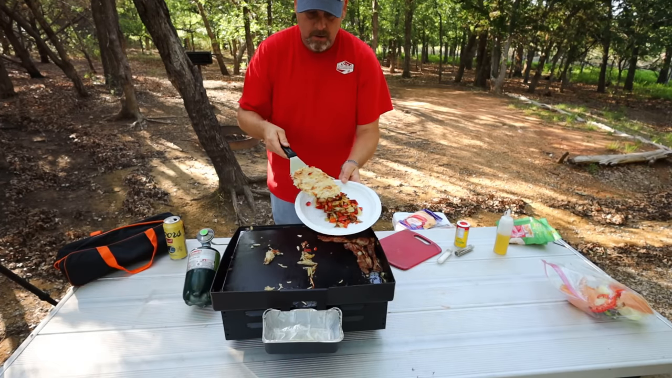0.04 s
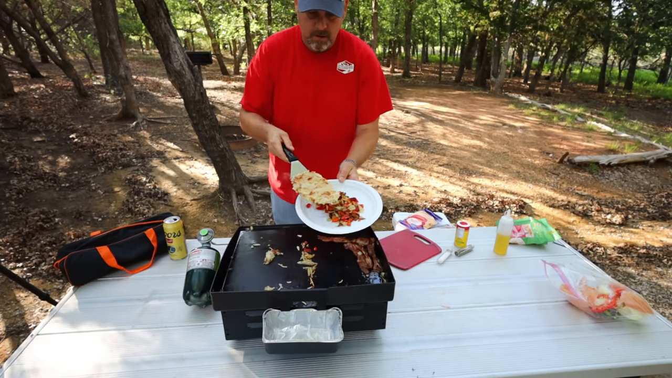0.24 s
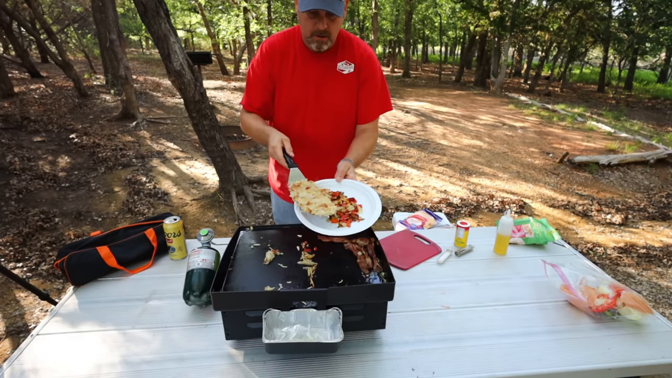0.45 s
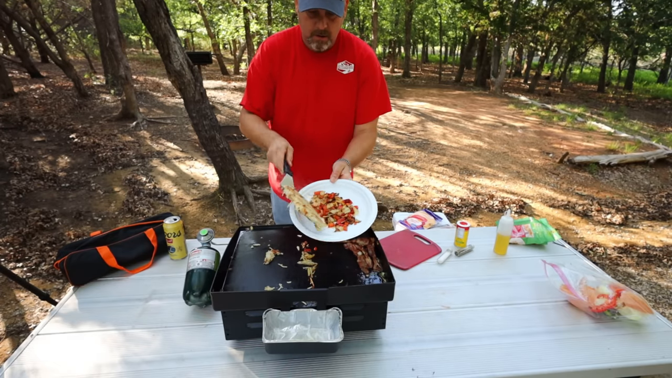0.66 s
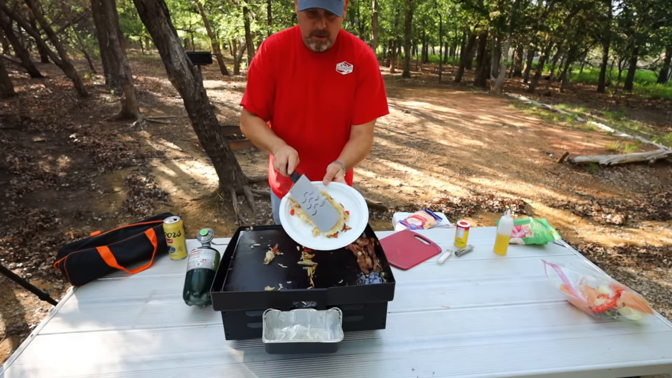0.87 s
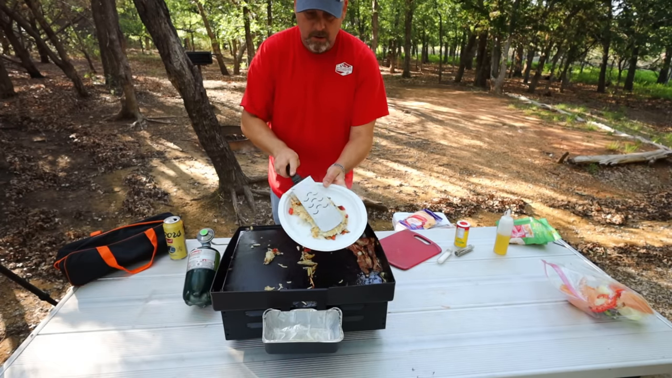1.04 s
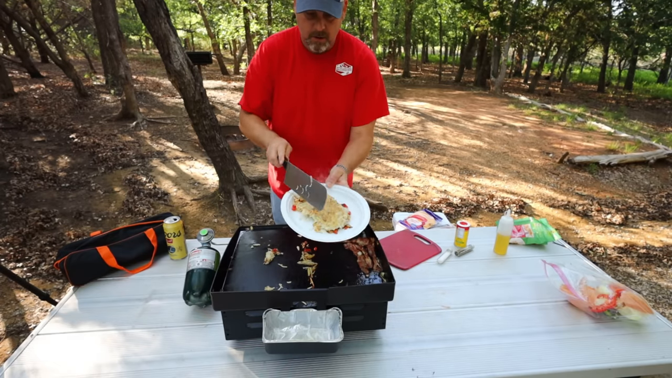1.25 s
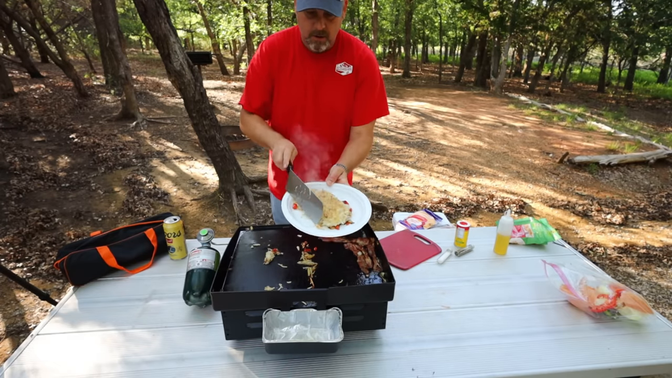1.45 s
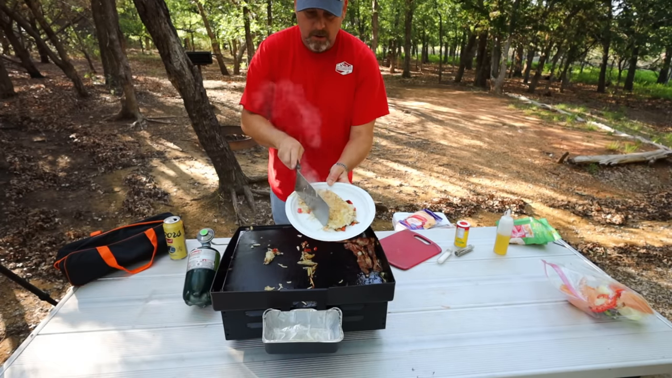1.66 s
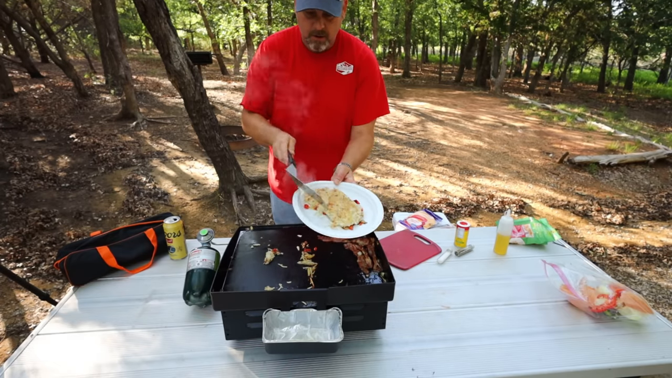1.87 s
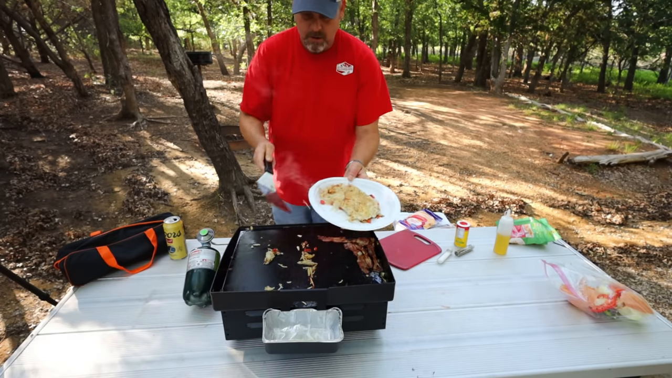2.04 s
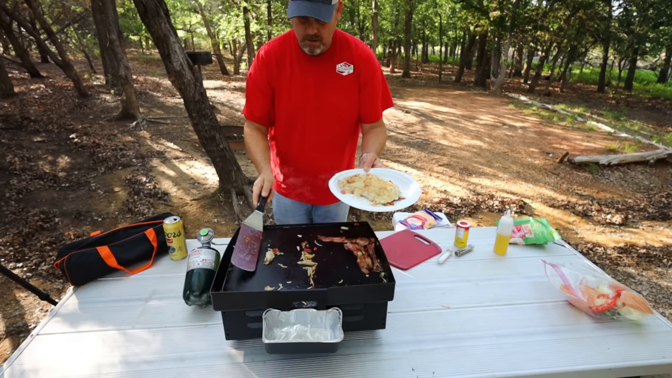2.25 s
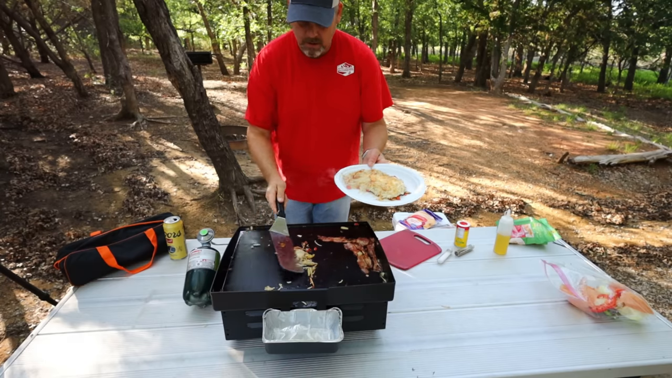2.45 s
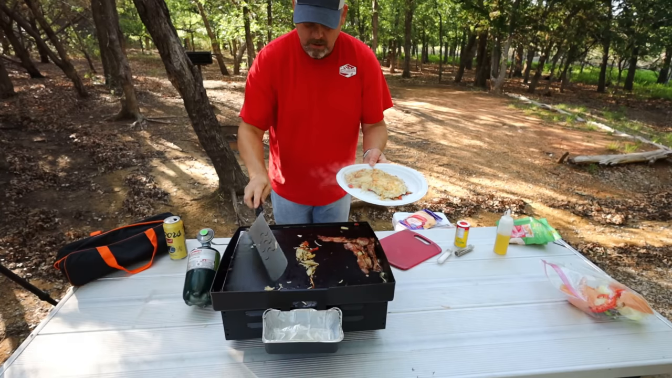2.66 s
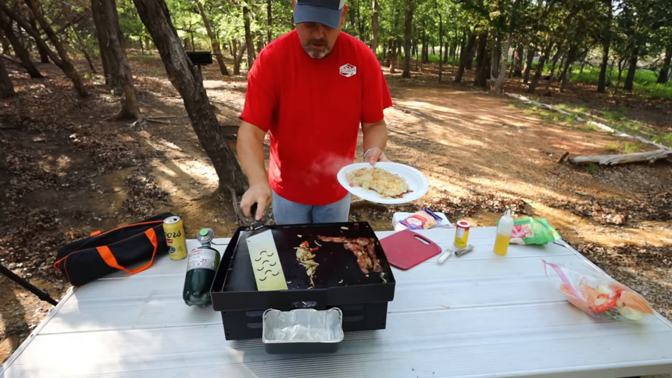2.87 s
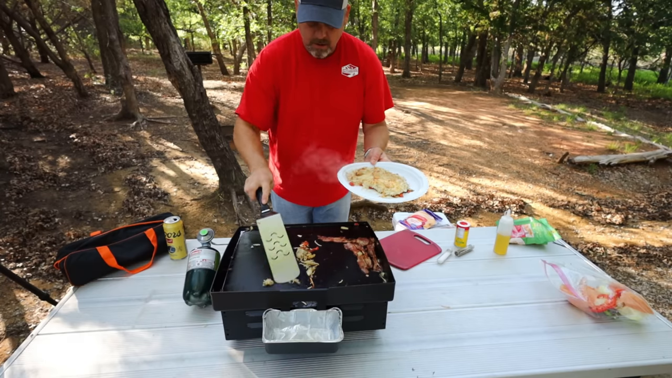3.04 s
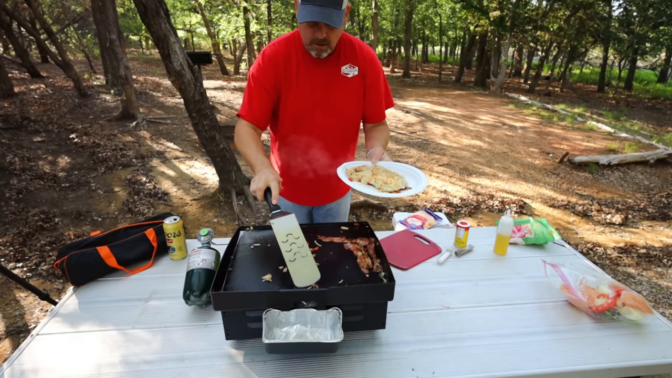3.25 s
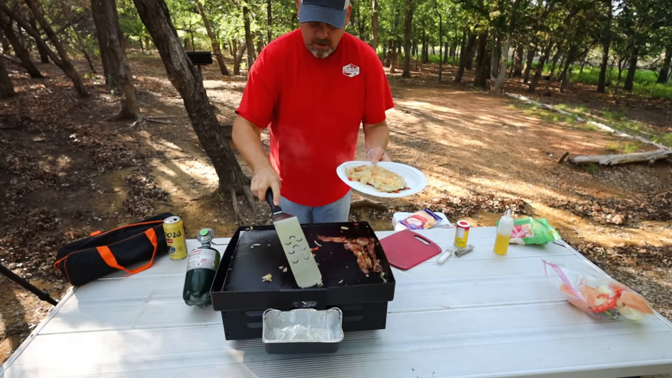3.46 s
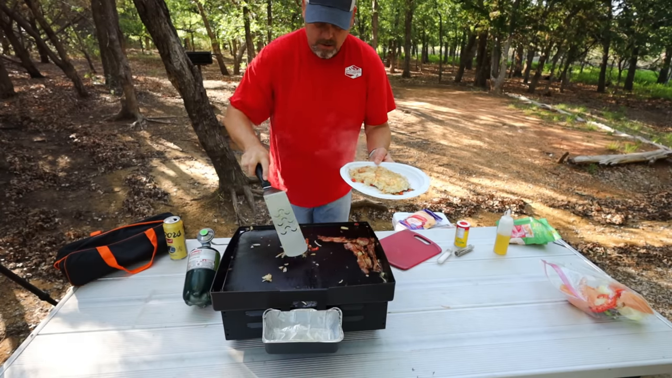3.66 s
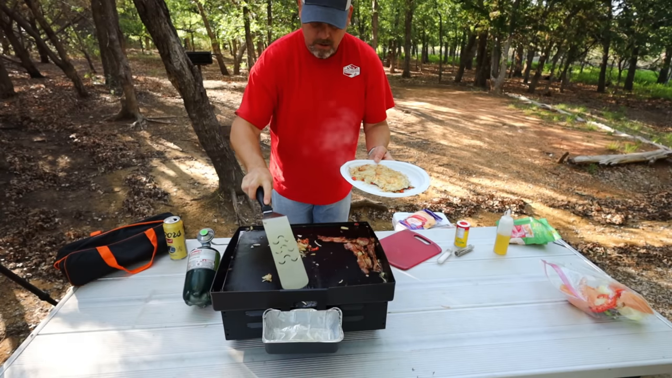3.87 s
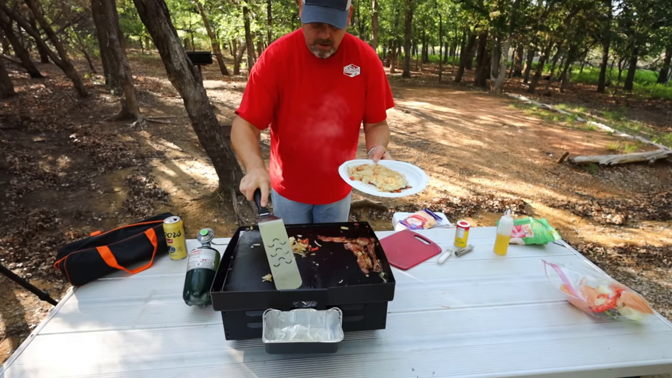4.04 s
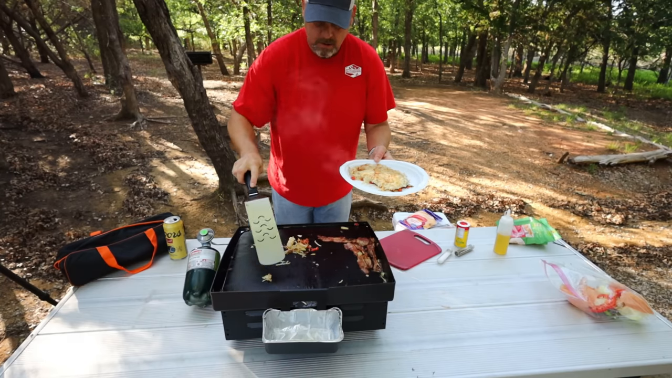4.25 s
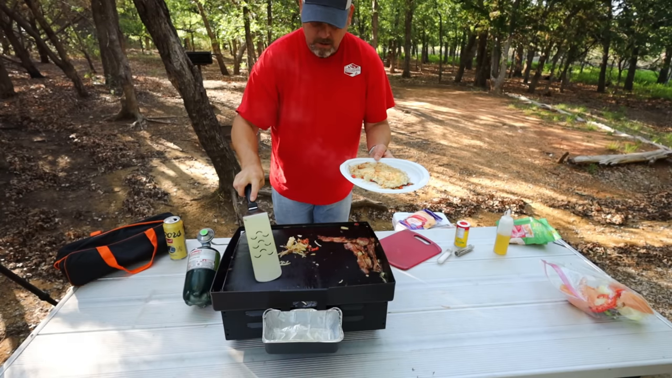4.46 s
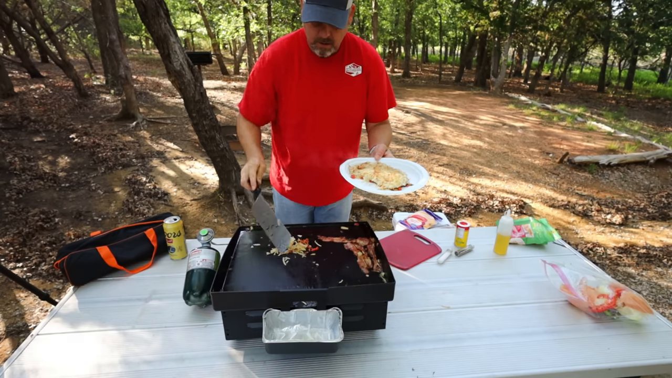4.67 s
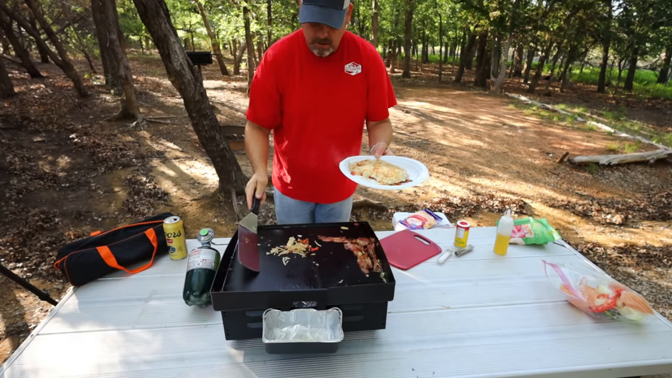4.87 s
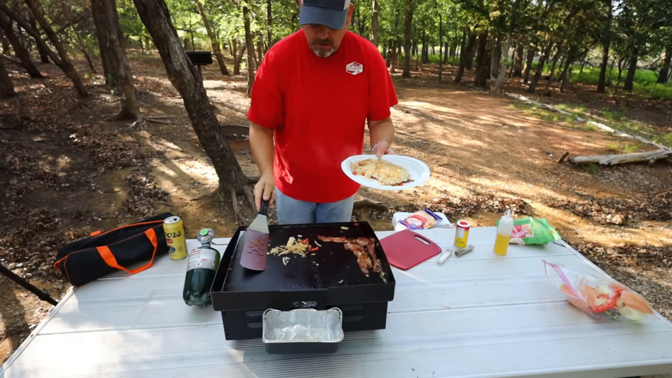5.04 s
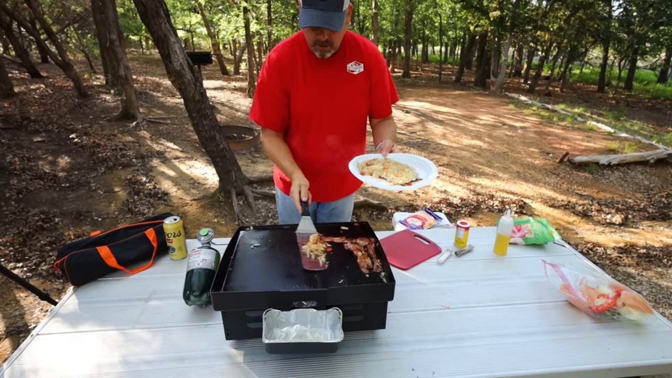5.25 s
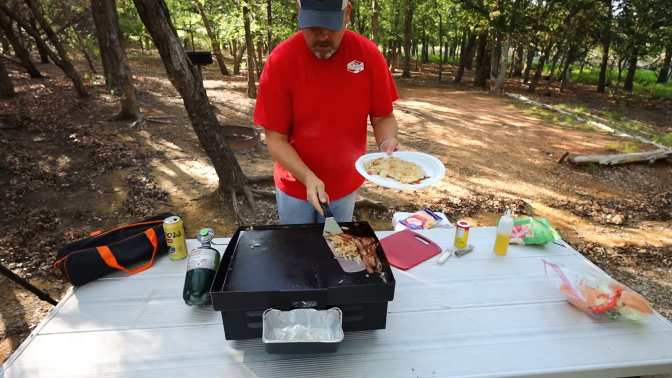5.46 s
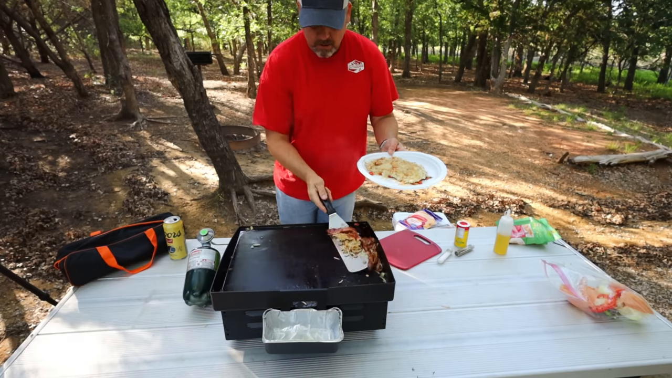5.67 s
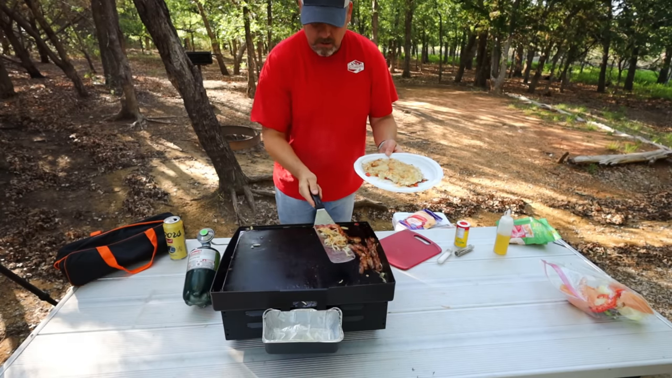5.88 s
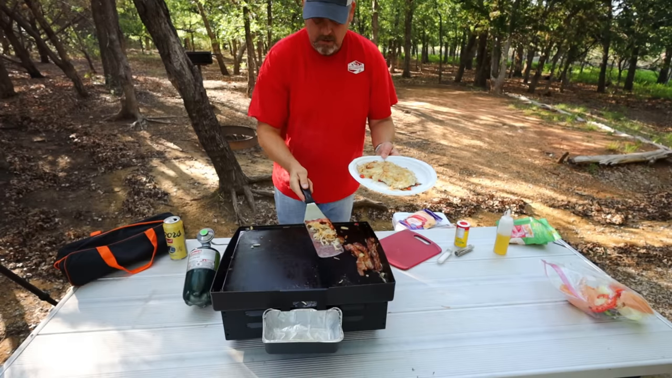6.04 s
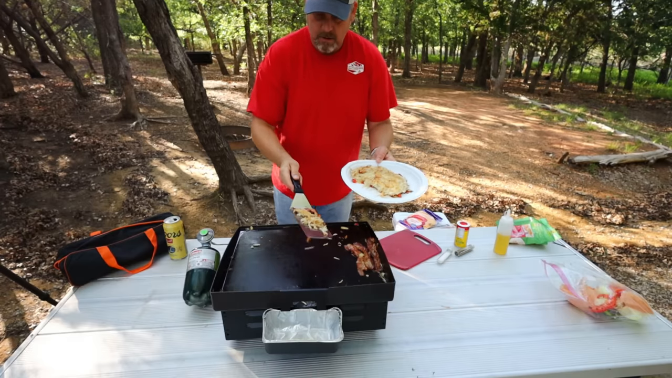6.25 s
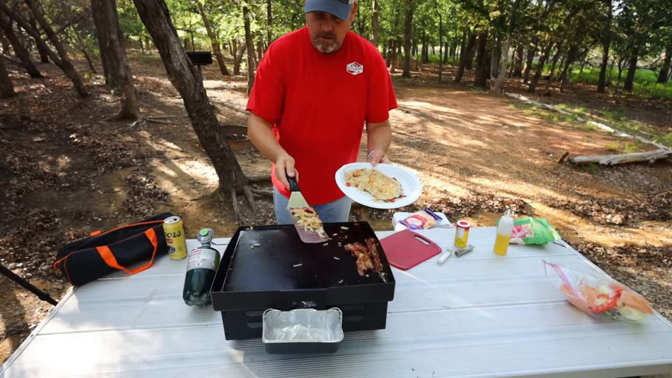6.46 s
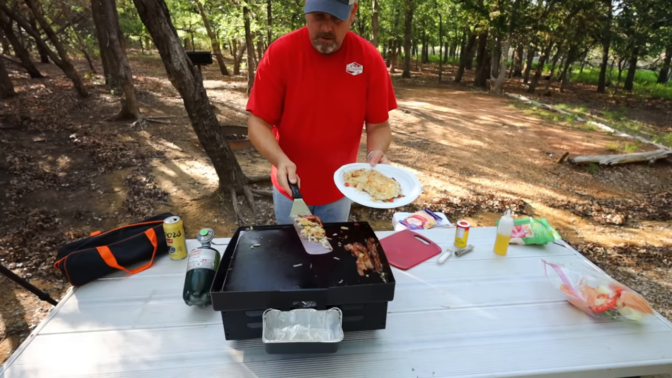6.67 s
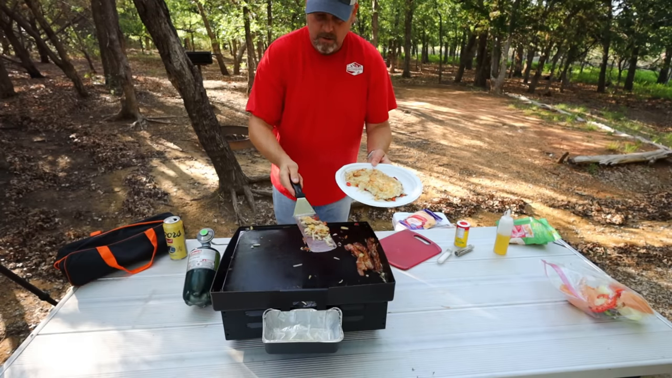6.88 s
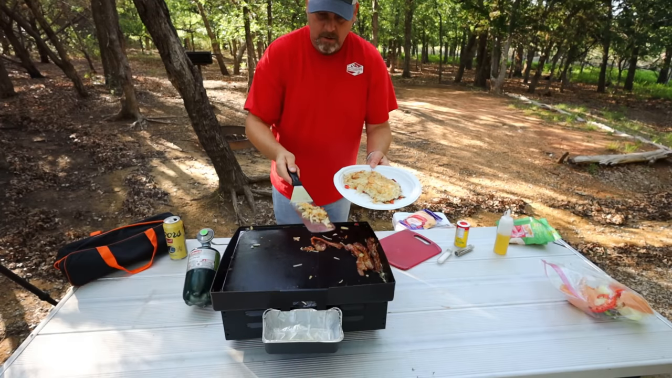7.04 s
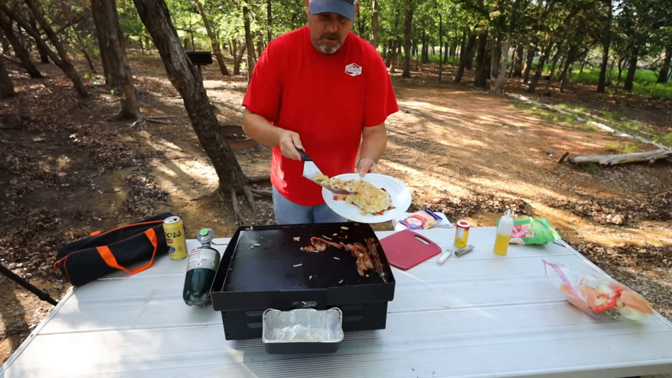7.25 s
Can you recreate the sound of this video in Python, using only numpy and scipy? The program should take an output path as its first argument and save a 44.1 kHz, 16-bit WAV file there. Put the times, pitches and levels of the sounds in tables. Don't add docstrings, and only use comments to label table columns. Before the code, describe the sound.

Fat sizzles and pops quietly on a hot steel griddle outdoors, then a metal spatula taps and scrapes it in short ringing strokes.

```python
import sys
import numpy as np
from scipy import signal
from scipy.fft import rfft, irfft
from scipy.io import wavfile

SR = 44100
rng = np.random.default_rng(int(sys.argv[2]) if len(sys.argv) > 2 else 0)


def int16_out(signal):
    q = np.round(np.clip(np.atleast_2d(signal).T, -1, 1) * 32767)
    wavfile.write(sys.argv[1], SR, q.astype(np.int16))


def ratio(d):
    e = np.asarray(d, float) / 20
    return 10 ** e


N = 322371

# (time [s], peak [dB], share of lower frame mode [dB], of upper frame mode [dB])
TAPS = [(2.326, -9.5, -11, -11.5), (2.894, -8, -3, 8.5), (3.044, -25.5, 7, -16), (3.392, -13, 1.5, -2),
        (3.46, -14, 0, -8), (3.562, -29, -8, 6), (3.994, -12.5, 0, -12), (4.038, -18.5, -23, -1.5),
        (4.122, -42, -6, 17), (4.472, -26, 5, -27), (4.9127, -14, 1, 3), (5.404, -31, -6, -8),
        (6.922, -32.5, 3, -6)]
# (frequency [Hz], density [dB per Hz])
SIZZLE = [(240, -25.5), (400, -6.5), (467, -7.5), (553, -9.5), (949, -6.5), (1270, -7.5), (1760, -5.5),
          (2360, -4.5), (3530, 1), (4580, -8), (7630, -1.5), (13700, 0), (16000, 1)]
# (frequency [Hz], density [dB per Hz])
STEEL = [(59, -55), (100, -66), (322, -16.5), (381, -28), (471, -19.5), (676, -17.5), (818, -16.5),
         (1830, -14), (2080, -13), (3470, -12.5), (5650, -27), (14400, -31.5), (16000, -8.5)]


def rms_one(x):
    return x / np.sqrt(np.mean(x ** 2) + 1e-20)


def in_time(rows, outside=None):
    s, *columns = np.transpose(rows)
    return [np.interp(np.arange(N) / SR, s, c, outside, outside) for c in columns]


def at_hz(points, hz):
    point_hz, point_db = np.transpose(points)
    return np.interp(np.log(hz), np.log(point_hz), point_db)


def drift(rate):
    r = np.exp(-80 * np.pi * rate / SR)
    slow = signal.lfilter([1], [1, -2 * r, r * r], rng.standard_normal(N // 40 + 2002))[2000:]
    return np.interp(np.arange(N) / 40, np.arange(len(slow)), rms_one(slow))


def ring(x, hz, t60):
    r, w = ratio(-60 / (t60 * SR)), 2 * np.pi * hz / SR
    return signal.lfilter([.5, 0, -.5], [1, -2 * r * np.cos(w), r * r], x + 1e-18)


def colour(x, spectrum):
    cepstrum = irfft(np.log(ratio(at_hz(spectrum, np.linspace(1, SR / 2, 2049)))))
    cepstrum[1:2048] *= 2
    cepstrum[2049:] = 0
    response = rms_one(irfft(np.exp(rfft(cepstrum)))) / 64
    return signal.fftconvolve(x, response)[:N]


def grains(per_s, spread_db):
    sizes = ratio(spread_db * np.minimum(rng.exponential(1, N), 5)) * rng.choice([-1, 1], N)
    return sizes * (rng.random(N) < per_s / SR)


def clicks(times, sizes):
    out = np.zeros(N)
    out[(np.asarray(times) * SR).astype(int)] = sizes
    return out


def bands(x, low_hz, high_hz):
    low, below = (signal.sosfiltfilt(signal.butter(2, hz, fs=SR, output="sos"), x + 1e-18)
                  for hz in (low_hz, high_hz))
    return low, below - low, x - below


def spatula():
    force = friction() * ratio([[4.0], [0], [5.0]])
    chatter = ratio(1.3 * drift(90))
    grit = [rms_one(grains(12000, 3.15)) * chatter for k in range(4)]
    return steel_modes(force, grit) + hollow_frame(force[0] * grit[0]) + rubbing(force, chatter)


def steel_modes(force, grit):
    # (frequency [Hz], level [dB], t60 [s])
    blade = [(838, -2, 0.24), (1390, -12, 0.18), (2770, 0.5, 0.13), (2940, -2, 0.22), (2890, -2, 0.3),
             (3400, 0, 0.16), (3850, -30, 1.2), (4900, -11, 0.58), (6000, -16, 0.12), (8400, -12, 0.12),
             (9300, -15, 0.15), (9900, -23, 0.3), (11500, -13, 0.15), (13930, -23, 0.088)]
    # (frequency [Hz], width [Hz], level [dB])
    griddle = [(328, 25, -19), (460, 12, -12.5), (597.7, 19.5, -11.5), (726, 10, -18.5), (860, 14, -39),
               (1003, 21, -9.5), (1203, 70, -6.5), (1858, 40, -7), (2550, 40, -4), (2890, 45, -2),
               (3030, 26, -11), (3410, 50, -2.5), (3600, 24, -1.5), (3985, 47, -18),
               (5130, 30, -13), (5900, 45, -31), (7050, 80, -10.5), (8290, 42, -9.5), (9100, 33, -32),
           (9520, 42, -21), (11030, 60, -17), (11870, 60, -17), (14450, 60, -39)]
    # (from [s], to [s],
    # frequency [Hz], width [Hz], level [dB])
    hums = [(2.325, 2.37, 1010, 150, -4), (2.2, 2.5, 1150, 93, -4.5), (2.43, 2.5, 2250, 46, -8),
            (2.39, 2.45, 5400, 60, -9), (2.9, 2.5, 3650, 50, -5), (2.35, 2.5, 7350, 80, -12),
            (2, 2.48, 5400, 60, -19), (2.45, 2.5, 5200, 60, -18), (2.32, 3, 3590, 18, -8),
            (2.6, 2.925, 1870, 30, -3), (2.887, 2.94, 962, 98, -4), (3.1, 2.93, 1300, 110, -7),
            (2.886, 3.036, 732, 12, -13.5), (2.88, 3.04, 7600, 54, -10), (3.05, 3.12, 1150, 210, -1.5),
            (3.8, 3.19, 3600, 36, -6.5), (3.4, 3.454, 518, 140, 2), (3.457, 3.55, 1290, 220, 3),
            (2.32, 2.6, 9500, 36, -17), (4.032, 4.28, 1203, 110, -1.5), (4.03, 4.28, 3400, 49, -0.5),
            (4.104, 4.33, 474, 10, -11.5), (4.465, 4.57, 459, 18, -11), (4.47, 4.63, 1480, 500, -6),
            (4.46, 4.696, 825, 15, -8), (4.455, 4.706, 3405, 28, 1), (4.465, 4.72, 9550, 24, -15),
            (5.02, 6.2, 331, 24, -15), (4.97, 5.193, 571, 23, -7.5), (5.28, 5.702, 528, 34, -11),
            (5.035, 5.7, 764, 29, -9.5), (5.1, 5.45, 3400, 330, -4), (4.5, 5.4, 14600, 400, -17),
            (2.95, 3.0, 6490, 60, -16), (2.97, 3.03, 6870, 40, -16), (2.95, 3.0, 7850, 80, -20),
                  (2.95, 3.01, 11700, 60, -15), (2.967, 3.005, 2960, 50, 1), (3.036, 3.092, 2500, 80, -2.5),
                  (3.05, 3.12, 12090, 70, -15), (3.05, 3.12, 8850, 60, -20), (3.064, 3.18, 1900, 40, -13),
                  (3.067, 3.19, 852, 25, -7), (3.077, 3.192, 1394, 30, -6), (3.384, 3.45, 3112, 40, -1),
                  (3.38, 3.425, 2460, 60, -6), (3.39, 3.423, 1930, 60, -7), (3.447, 3.54, 2476, 60, 0),
                  (3.45, 3.537, 3110, 50, -0.5), (3.46, 3.533, 4102, 60, -11),
                  (3.465, 3.623, 9130, 40, -17.5), (3.46, 3.62, 14300, 80, -24), (3.51, 3.6, 2733, 50, -5),
                  (3.553, 3.625, 5970, 40, -17), (3.55, 3.597, 1263, 60, -4), (3.99, 4.035, 2640, 80, 0.5),
                  (3.99, 4.035, 3270, 60, -10), (3.99, 4.035, 1000, 60, -9.5), (3.99, 4.035, 7677, 80, -19),
                  (4.045, 4.172, 4830, 60, -12), (4.04, 4.2, 13000, 60, -19), (4.12, 4.169, 1847, 40, -5),
                  (4.107, 4.21, 4113, 50, -9), (4.18, 4.234, 2200, 40, 0), (4.173, 4.26, 3030, 40, -7),
                  (4.463, 4.53, 3566, 35, -7), (4.468, 4.574, 8430, 50, -15),
                  (4.526, 4.63, 11750, 90, -13.5), (4.56, 4.637, 2520, 50, -1),
                  (4.573, 4.636, 2890, 35, -8), (4.57, 4.64, 8500, 40, -22.5), (4.517, 4.63, 6540, 60, -21),
                  (4.91, 4.957, 5260, 80, -11),
            (5.05, 5.14, 3036, 40, 4.5), (4.6, 5.2, 3000, 46, -11), (5.1, 5.22, 3420, 60, -6),
                 (5.19, 4.3, 4000, 40, -8), (5.2, 4.4, 1860, 30, -11), (5.24, 5.36, 3045, 45, -8),
                 (4.8, 5.35, 2401, 50, -6.5), (5.35, 5.46, 3305, 60, 1), (5.8, 4.7, 9550, 60, -24),
                 (4.2, 5.3, 6010, 40, -19), (5.13, 5.3, 14490, 90, -12), (6.3, 5.3, 13920, 40, -14),
                 (5.7, 5.36, 14650, 80, -15), (5.19, 5.28, 11280, 55, -16), (5.05, 5.9, 7300, 140, -16),
                 (5.35, 6.4, 1400, 30, -13), (5.42, 5.55, 1200, 40, -3)]
    damping = .06
    small_hz = np.geomspace(270, 14600, num=110) * rng.uniform(0.9, 1.03, size=110)

    modes = [(hz, db - 19.5, min(t60, .22), 1) for hz, db, t60 in blade]
    for hz in small_hz:
        db = at_hz(STEEL, hz) - 5.0 + 2.95 * np.log2(hz / 3000)
        modes.append((hz, db, min(.1, 240 / hz), woken(hz)))
    for hz, width, db in griddle:
        modes.append((hz, db - 9.0, min(11.4 / width, 60 / np.sqrt(hz) * damping), woken(hz)))
    t, steady = np.arange(N) / SR, len(modes)
    for start, end, hz, width, db in hums:
        caught = (t >= start) & (t < end)
        modes.append((hz, db - 8.0, min(4.3 / width, 60 / np.sqrt(hz) * damping), caught))

    wander = [ratio(1.2 * drift(5.5)) for k in range(8)]
    s, tap_db, *_ = np.transpose(TAPS)
    luck = rng.normal(size=(len(TAPS), len(modes)))
    out = np.zeros(N)
    for k, (hz, db, t60, place) in enumerate(modes):
        contact = int(hz > 1400) + int(hz > 5200)
        share = wander[k % 8] * wander[k // 8 % 8] if k < steady else 1
        rub = force[contact] * grit[k % 4] * share / np.sqrt(t60 * SR / 28)
        blunt_db = -4.5 - 4.9 * np.log2(hz / 1000)
        tap = clicks(s, luck[:, k] * ratio(tap_db + blunt_db))
        out += ratio(db) * ring((rub + tap) * place, hz, t60)
    return signal.sosfilt(signal.butter(2, 240, "high", fs=SR, output="sos"), out)


def hollow_frame(rub):
    # (frequency [Hz], level [dB], t60 [s])
    frame_modes = [(81.3, -16, 0.39), (164.6, -7.5, 0.23)]
    s, tap_db, *frame_db = np.transpose(TAPS)
    out = np.zeros(N)
    for (hz, db, t60), share_db in zip(frame_modes, frame_db):
        push = signal.lfilter(np.hanning(240) / 120, 1, clicks(s, ratio(tap_db + share_db - 17.5)))
        out += ratio(db) * ring(push + ratio(-54.5) * rub, hz, t60)
    return out


def rubbing(force, chatter):
    parts = bands(colour(rms_one(grains(15000, 4.5)) * chatter, STEEL), low_hz=1400, high_hz=4900)
    patchy = ratio([[2.0], [2.0], [3.0]] * np.array([drift(27) for band in range(3)]))
    s, tap_db, *_ = np.transpose(TAPS)
    crack = signal.lfilter([1], [1, -ratio(-60 / (0.072 * SR))], clicks(s, ratio(tap_db - 11.5)))
    rub = ratio(-5.0) * np.sum(force * parts * patchy, axis=0)
    return rub + crack * (parts[0] + parts[1] + ratio(-29.0) * parts[2])


def friction():
    # (start [s], length [s], friction at start [dB], at lift-off [dB], griddle share [dB])
    scrapes = [(2.339, 0.13, -30, -20.5, -4), (2.951, 0.034, -32, -24, -3), (3.044, .026, -26, -18.5, -8),
               (3.073, 0.029, -20, -19.5, -6), (3.457, 0.066, -27.5, -19.5, -9),
               (3.559, 0.035, -18.5, -21, -8), (4.038, 0.11, -26, -14.5, -12.5),
               (4.137, 0.051, -17.5, -20.5, -8.5), (4.506, 0.1, -20, -20.5, -6),
               (5.044, 0.069, -37, -24, 0.5), (5.123, 0.108, -23, -18, -7.5),
               (5.227, 0.068, -20.5, -25, -8), (5.302, 0.078, -21, -28, -4), (5.387, 0.05, -28, -30.5, -1),
               (5.555, 0.19, -60.5, -75, 10.5)]
    # (time [s], friction [dB], fall [dB per s], griddle share [dB], edge share [dB])
    landings = [
        (2.8933, -21.5, 303, 9, -33),
        (3.393, -20.5, 698, -4, -24),
        (3.995, -21, 552, -0.5, 1.5),
        (4.467, -16.5, 218, -6, -6),
        (4.912, -27.5, 316, 8, 2.5),
        (6.921, -38.5, 300, -5.5, -12),
    ]
    attack, impact = 3013, 39994
    lift, lift_slows_s = 591, 0.15
    settle_db, settle_rate, settle_share = 22.5, 124, 0.46
    griddle_lingers, edge_lingers = 0.35, -0.11

    rows = [(s, long, a, b, attack, lift / (1 + long / lift_slows_s), griddle_db, -1.5)
            for s, long, a, b, griddle_db in scrapes]
    rows += [(s, .001, db, db, impact, fall, griddle_db, edge_db)
             for s, db, fall, griddle_db, edge_db in landings]
    t, best_db = np.arange(N) / SR, np.full((3, N), -150.)
    for s, long, start_db, end_db, rise, fall, griddle_db, edge_db in rows:
        lifted = s + long + settle_db / fall
        loose_db = end_db - settle_db
        rest_db = loose_db - max(settle_rate, fall * settle_share)
        db = np.interp(t, [s - 1, s, s + long, lifted, lifted + 1],
                       [start_db - rise, start_db, end_db, loose_db, rest_db])
        lighter = np.clip(max(start_db, end_db) - db, 0, 45) * (t > s)
        shares_db = [griddle_db + griddle_lingers * lighter, 0 * db, edge_db + edge_lingers * lighter]
        best_db = np.maximum(best_db, db + shares_db)
    return ratio(best_db)


def woken(hz):
    # (time [s], distance from the rim [m])
    places = [(2.32, 0.399), (2.89, 0.44), (3.04, 0.445), (3.39, 0.502), (3.451, 0.2), (3.55, 0.459),
              (3.99, 0.16), (4.465, 0.4), (4.911, 0.487), (5.04, 0.024), (5.219, 0.507), (6.915, 0.528)]
    s, place_m = np.transpose(places)
    wavelength_m = .2 / np.sqrt(hz / 1000)
    crest = np.cos(4 * np.pi * place_m / wavelength_m)
    now = np.maximum(np.searchsorted(s, np.arange(N) / SR) - 1, 0)
    return ratio(4 * (crest - 1.5))[now]


def singing():
    # (time [s], frequency [Hz], peak [dB], t60 [s])
    freed = [(2.33, 950, -42, 0.097), (2.49, 1000, -33, 0.27), (2.899, 2890, -22.5, 0.22),
             (3.085, 3410, -18.5, 0.14), (3.458, 3500, -14.5, 0.054), (3.562, 3463, -14, 0.048),
             (3.585, 3046, -20.5, 0.23), (3.59, 439, -43, 0.68), (3.992, 333, -28, 0.13),
             (4.2, 478, -42.5, 0.42), (4.602, 2894, -21.5, 0.26), (4.612, 9500, -35, 0.21),
             (4.19, 9520, -39, .2), (4.63, 4000, -46, 0.3), (4.62, 840, -41, 0.23),
             (4.913, 1000, -26, 0.12), (4.913, 1173, -24, 0.13), (4.93, 2890, -31, 0.32),
             (4.99, 591, -40, 0.43), (5.404, 3046, -24, 0.23)]
    swell = np.hanning(260) / 130
    out = np.zeros(N)
    for s, hz, db, t60 in freed:
        push = swell * np.cos(2 * np.pi * hz * np.arange(len(swell)) / SR) * 2
        out += ring(signal.fftconvolve(clicks([s], ratio(db)), push)[:N], hz, t60)
    return out


def snags():
    # (time [s], frequency [Hz], peak [dB], t60 [s])
    barks = [(2.327, 3000, -28, .02), (2.4525, 3260, -28, .015), (2.468, 3200, -22, .015),
             (2.8925, 2900, -13, 0.018), (2.8958, 1500, -12, 0.014), (2.903, 1870, -6.5, 0.01),
             (2.908, 810, -6, 0.011), (2.98, 3000, -18.5, .015), (3.074, 3280, -4, 0.018),
             (3.393, 1960, -24, 0.023), (3.483, 3320, -15, .02), (3.518, 2760, -9, 0.022),
             (4.1258, 3350, -1, .012), (4.1375, 3460, -12, .015), (4.1505, 3600, -18, .015),
             (4.158, 3400, -13, 0.021), (4.1885, 3400, -12, .015), (4.4745, 3580, -12, .015),
             (4.4805, 2430, -6, 0.015), (4.604, 3250, -25, 0.016), (4.617, 2850, -9.5, 0.017),
             (4.9125, 1000, -5, 0.034), (4.914, 3170, -15, .015), (4.918, 3000, -11, .012),
             (4.9185, 950, -15, 0.037), (4.9265, 3200, -15.5, 0.015)]
    swell = np.hanning(24) / 12
    out = np.zeros(N)
    for s, hz, db, t60 in barks:
        push = swell * np.cos(2 * np.pi * hz * np.arange(len(swell)) / SR)
        out += ring(np.convolve(clicks([s], ratio(db)), push)[:N], hz, t60)
    return out


def frying():
    # (time [s], vigour [dB], share of fine spray [dB])
    vigour = [(0.0, -56, -3), (1.4, -57.5, -3.5), (1.95, -60.5, -2.5), (2.3, -56.5, -5), (2.55, -50.5, -4),
              (2.83, -53, -0.5), (3.2, -51, -13.5), (3.44, -54.5, -9), (3.56, -42, -8), (3.95, -49, -3.5),
              (4.78, -56.5, 0.5), (5.1, -49, -15), (5.3, -35.5, -11.5), (5.56, -53.5, -9.5),
              (5.82, -61, -8.5), (6.29, -64, -4.5), (6.84, -55.5, 1), (7.31, -58, -3)]
    rim_db, spray_db = in_time(vigour)
    clump = ratio(5.0 * drift(50))
    broad, large, small = (rms_one(grains(per_s * clump, 3.7)) for per_s in (500, 500, 700))
    dull = sum(bands(large, low_hz=1500, high_hz=5870)[:2])
    thin = bands(small, low_hz=1500, high_hz=6960)[2]
    crackle = broad + ratio(-0.5) * dull + ratio(1.0) * thin
    drops, dealt = grains(600 * clump, 3.6), rng.integers(0, 12, N)
    pitches = np.geomspace(2000, 14000, num=12)
    fizz = sum(ring(drops * (dealt == k), hz, 6.1 / hz) for k, hz in enumerate(pitches))
    hiss = rng.standard_normal(N) * ratio(1.5 * drift(20))
    fat = colour(ratio(1.5) * crackle + ratio(-8.0) * rms_one(fizz) + ratio(-1.0) * hiss, SIZZLE)
    low, middle, high = bands(fat, low_hz=1510, high_hz=4980)
    return ratio(rim_db + 7.0) * (low + middle) + ratio(rim_db + spray_db + 3.0) * high


def pops():
    # (time [s], peak [dB])
    full = [(0.0601, -21.5), (.174, -20.5), (.2059, -19), (0.3444, -22.5), (0.6057, -22), (0.6124, -13.5),
            (0.654, -13.5), (.8155, -20), (0.8796, -18), (1.3423, -20), (1.459, -20), (1.63, -19),
            (1.71, -20), (1.7396, -19.5), (1.8909, -22.5), (2.1331, -18.5), (2.1673, -21), (2.2052, -21.5),
            (2.556, -21), (2.6278, -22), (2.6669, -14.5), (2.801, -14.5), (3.7629, -24), (4.3939, -17.5),
            (4.438, -18), (4.813, -21), (4.867, -21),
            (5.5753, -20.5), (5.647, -26), (5.7153, -21.5), (5.749, -28), (5.82, -26), (5.8513, -22.5),
            (6.0053, -28), (6.0107, -31), (6.1996, -18.5), (6.2087, -20.5), (6.3533, -19.5), (6.357, -30),
            (6.4072, -30), (6.467, -26), (6.4754, -20), (6.4938, -18), (6.5033, -17.5), (6.551, -24),
            (6.582, -21.5), (6.6926, -23), (6.7402, -19.5), (6.7714, -22), (6.9245, -19), (7.1108, -25.5),
            (7.2714, -30)]
    # (time [s], peak [dB])
    spits = [(.2059, -30), (0.3433, -39.5), (0.6615, -39.5), (0.7536, -34), (0.8427, -39), (1.1954, -36),
             (1.305, -41), (1.6208, -38), (1.6904, -42), (1.992, -45), (2.7037, -30.5), (3.3054, -54),
             (3.3677, -55), (3.9532, -32), (4.4376, -31.5), (4.4507, -30), (4.7721, -47), (5.448, -31),
             (5.8182, -41), (6.0053, -39), (6.122, -44.5), (6.3375, -47), (6.407, -40.5), (6.8454, -47),
             (7.0449, -35.5), (7.1108, -39), (7.272, -40.5)]
    rows = [(s, db, -28) for s, db in full]
    rows += [(s + .0001, db + 6, -6) for s, db in spits]
    s, db, bright_db = np.transpose(rows)
    s = s + 0.00082
    sign = rng.choice([-1, 1], len(s))
    fade = signal.lfilter([1], [1, -ratio(-60 / (.025 * SR))], clicks(s, ratio(db)))
    splash = ratio(-19.5) * fade * grains(11000, 4.96)
    burst = colour(clicks(s, sign * ratio(db + 4.0)) + splash, SIZZLE)
    dull = sum(bands(burst, low_hz=1500, high_hz=6600)[:2])
    bright = bands(clicks(s, sign * ratio(db + bright_db + 19.5)), low_hz=3000, high_hz=6160)[2]
    pulse = dull + bright
    return pulse + ratio(-14) * np.roll(pulse, int(.0012 * SR))


def plate():
    # (time [s], peak [dB])
    knocks = [
        (1.476, -16.5),
    ]
    # (frequency [Hz], level [dB], t60 [s])
    paper = [(360, -14.5, 0.038), (685, -5.5, 0.013), (1000, 4.5, 0.01), (950, -24, 0.1),
             (1900, -14, 0.0088), (3250, -1.5, 0.0067)]
    # (time [s], level [dB])
    strokes = [
        (1.494, -41),
        (1.528, -44),
        (1.6, -46),
        (1.63, -52),
        (1.68, -50),
        (1.76, -51),
        (1.792, -59),
        (1.83, -52.5),
        (1.87, -102),
    ]
    # (frequency [Hz], density [dB per Hz])
    brush_colour = [(120, -36), (200, -17), (253, -4.5), (409, -6), (800, -0.5), (967, 2.5), (1200, 1),
                    (1980, -8), (3950, -8.5), (4500, -20), (5850, -51), (9900, -120)]
    # (time [s], peak [dB], frequency [Hz])
    bumps = [
        (0.941, -37, 99),
    ]
    (s, knock_db), = knocks
    blow = clicks([s + .001, s + .0042], -ratio([knock_db, knock_db - 8]))
    blow = signal.lfilter(np.hanning(20) / 10, 1, blow)
    knock = sum(ratio(db + 2.0) * ring(blow, hz, t60) for hz, db, t60 in paper)
    knock = signal.sosfilt(signal.butter(2, 220, "high", fs=SR, output="sos"), knock)
    grit = grains(9000, 2.0) * ratio(1.8 * drift(30))
    brush = ratio(in_time(strokes, -150)[0]) * rms_one(colour(grit, brush_colour))
    out = knock + brush
    for s, db, hz in bumps:
        out += ring(signal.lfilter(np.hanning(150) / 75, 1, clicks([s], ratio(db))), hz, 0.036)
    return out


def woods():
    # (frequency [Hz], density [dB per Hz])
    rumble = [(12, -75), (20, -29), (48, -11), (82, 3.5), (172, 1.5), (229, -2), (317, -1), (555, -14),
              (1500, -14.5), (1950, -27), (3300, -120)]
    return ratio(-63.5 + 0.5 * drift(3.1)) * rms_one(colour(rng.standard_normal(N), rumble))


def scene():
    mono = spatula() + singing() + snags() + frying() + pops() + plate() + woods()
    return np.tile(mono, (2, 1))


def low_pass(x):
    return signal.sosfilt(signal.butter(12, 16970, fs=SR, output="sos"), x)


def record(dry):
    cut = signal.sosfilt(signal.cheby2(20, 48, 15800, fs=SR, output="sos"), dry)
    return low_pass(cut)


dry = scene()
out = record(dry)
int16_out(out)
```